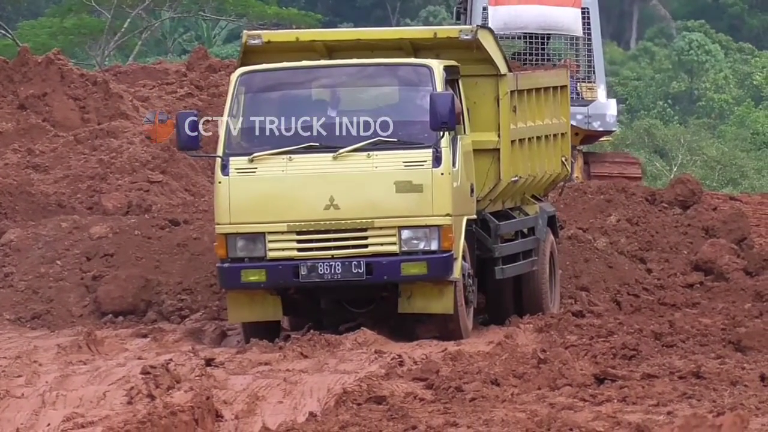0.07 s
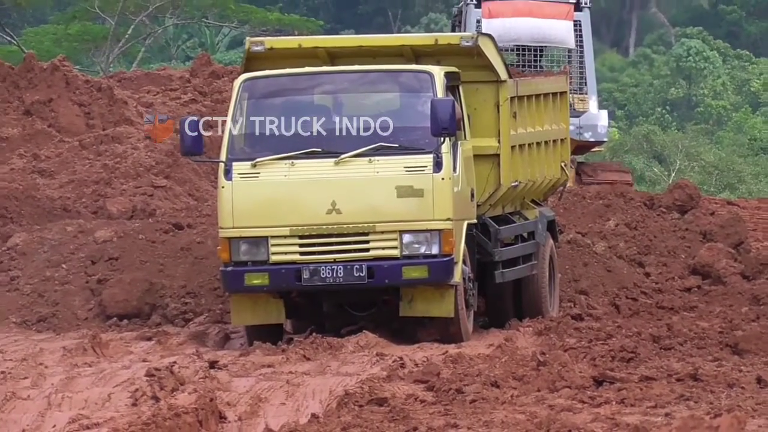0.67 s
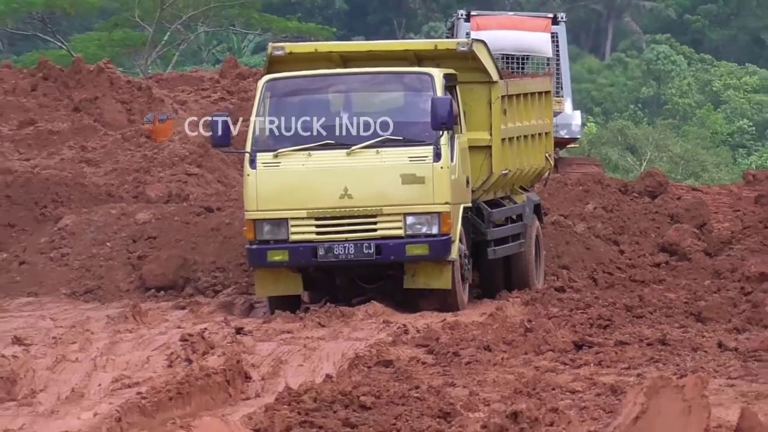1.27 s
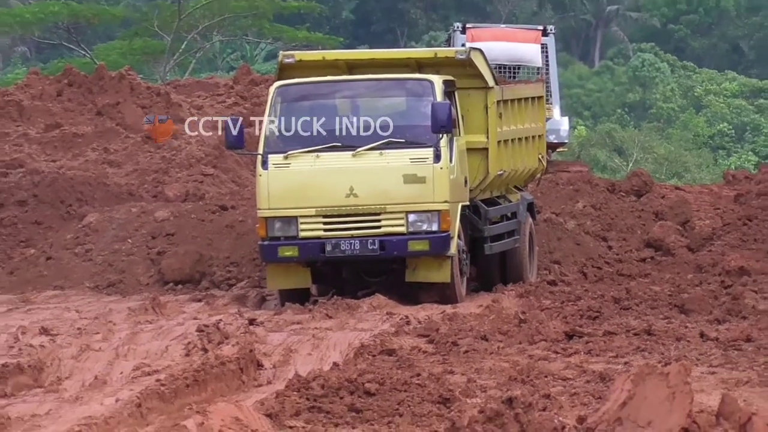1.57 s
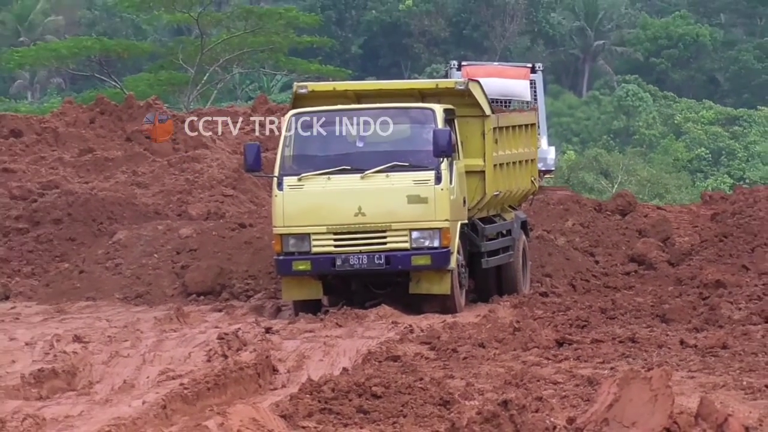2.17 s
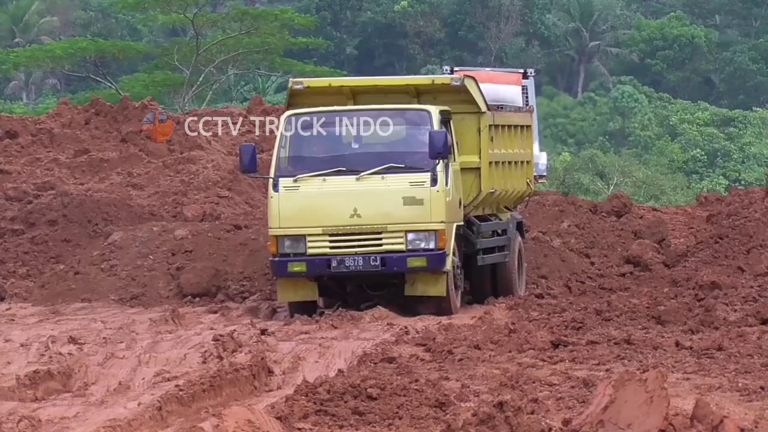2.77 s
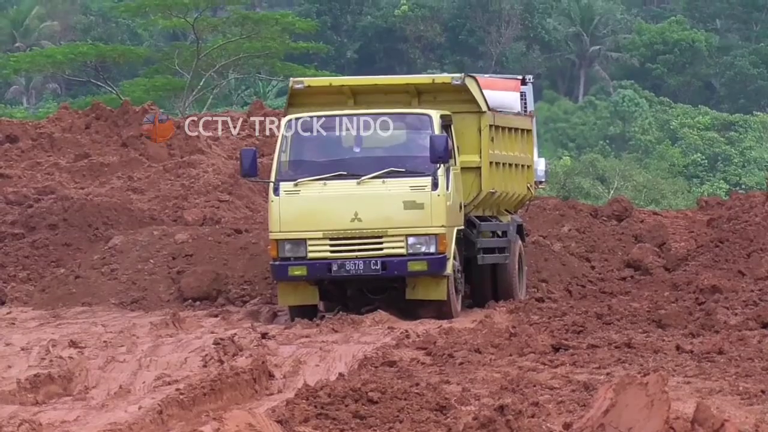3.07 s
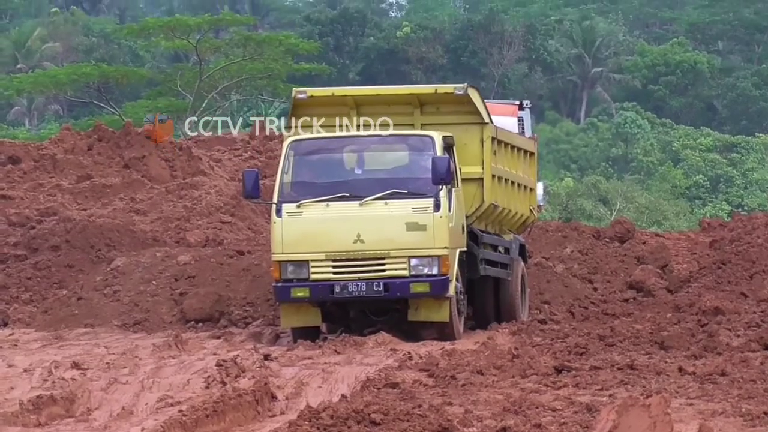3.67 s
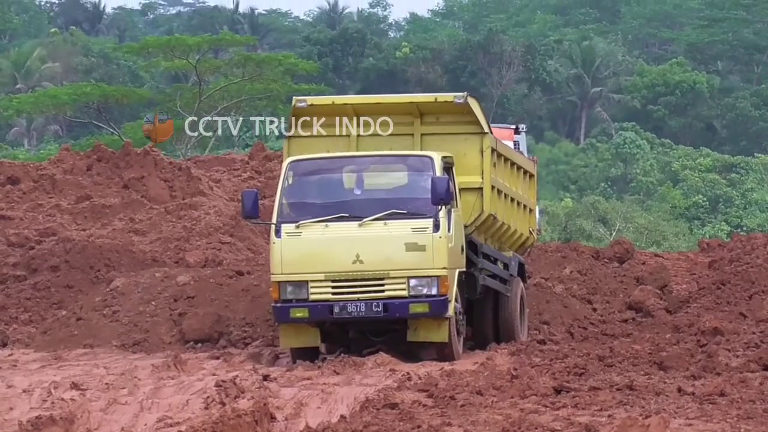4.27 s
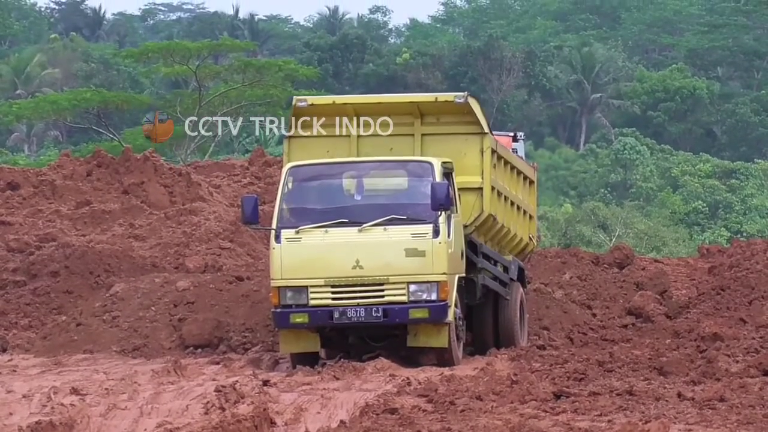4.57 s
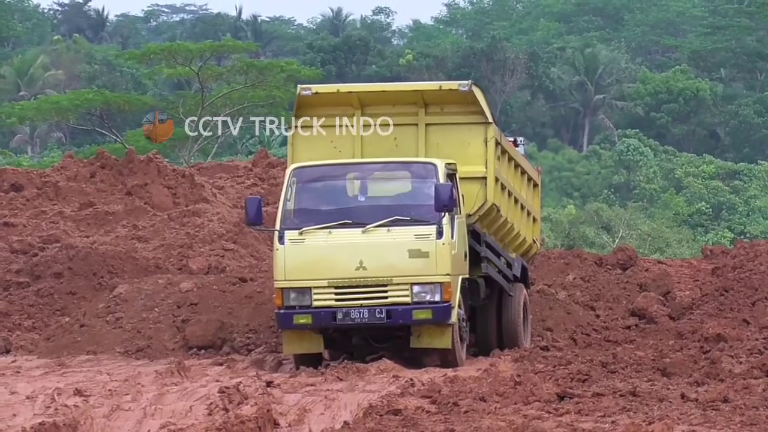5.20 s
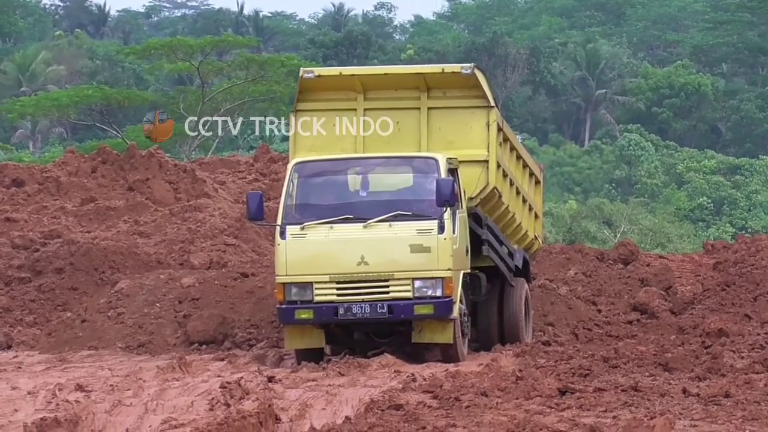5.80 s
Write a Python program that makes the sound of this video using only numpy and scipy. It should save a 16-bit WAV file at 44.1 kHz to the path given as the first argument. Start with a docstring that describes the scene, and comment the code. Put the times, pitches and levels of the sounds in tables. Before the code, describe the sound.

A diesel dump truck and an excavator run together outdoors, slightly left of a stereo microphone. At the very start a valve releases a puff of air that fades within a second. The truck's revs fall from about 0.4 seconds to a clattering idle, while the excavator holds a steady, fast drone. Its steel bucket thuds and clanks irregularly from 0.6 seconds, loudest just after 1 second and again around 2.5, with a brief echo off earth banks. Hydraulic oil hisses in soft surges, and a pump whines faintly on and off. Thin, very high squeaks come from the right between 2.2 and 2.8 seconds and again near 3.8. At about 3.6 seconds the truck's note swells a little as the hoist lifts the bed, and the knocks grow sparse. From 5.3 seconds grit ticks and trickles down the bed, the engines running on until nearly 6 seconds.

```python
"""A diesel dump truck tips its bed on an earthworks site, a little left of a stereo microphone.
Its firings sound the exhaust and ring block and chassis; the revs fall to idle, then the note swells
as the hoist takes the load. Behind it an excavator runs at steady high speed, its steel bucket clanking
and thudding. Air puffs from a valve, oil hisses, grit ticks on the bed and something squeaks thinly
off to the right; the earth banks answer the bucket briefly."""
import sys
import numpy as np
from scipy import signal
from scipy.fft import rfft, irfft, next_fast_len
from scipy.io import wavfile
from scipy.ndimage import uniform_filter1d, map_coordinates

SR = 44100
rng = np.random.default_rng(int(sys.argv[2]) if len(sys.argv) > 2 else 0)


def persist_wave(psi):
    """Save psi, clipped to +-1, as 16-bit WAV."""
    counts = np.round(np.clip(psi, -1, 1) * 32767).astype(np.int16)
    wavfile.write(sys.argv[1], SR, np.atleast_2d(counts).T)


N = 257544

# Noise colours. Each row: frequency in Hz, relative spectral level in dB.
RUMBLE_SPECTRUM = [(20, -30), (35, -18), (48, -13), (60, 3), (80, -6), (110, -13), (180, -30), (400, -75)]  # the machines' low rumble
DRONE_SPECTRUM = [(80, -26), (122, -7), (150, -4), (190, -0.5), (225, -4.5), (265, -11), (330, -13),
                  (440, -11.5), (530, -14), (700, -26), (1500, -69)]  # the excavator's engine
RATTLE_SPECTRUM = [(180, -47), (280, -19), (350, 19), (480, -9.5), (650, 13), (1500, -73)]  # the bucket's rattling panels
CRUNCH_SPECTRUM = [(350, -23), (510, 3.5), (700, -7), (1100, -1), (1400, -15), (1850, -20), (4000, -52)]  # earth under the bucket
SCRAPE_SPECTRUM = [(700, -37), (1500, -0.5), (2300, -1), (3200, -3), (4000, -5.5), (5500, -11),
                   (8000, -11.5), (10500, -12), (12000, -28), (15000, -34)]  # scraped steel
OIL_SPECTRUM = [(900, -1), (2000, 1), (3300, 1.5), (4300, 0.5), (5600, -5), (7700, -2), (9500, -2),
                (11500, -6.5), (13500, -16), (15300, -19)]  # oil through valves
AIR_SPECTRUM = [(1000, 4), (2200, -4), (4000, -1.5), (5600, -4.5), (8000, -2), (9500, -3), (11500, -8.5),
                (13500, -14), (15300, -30)]  # escaping air
GRIT_SPECTRUM = [(2500, -2.5), (5500, -12), (7500, 4.5), (10000, 1), (13000, -5.5), (15300, -9.5)]  # stones on the bed
CLATTER_SPECTRUM = [(300, -44), (520, 1.5), (640, 6), (900, 4.5), (1250, 0), (1450, -2), (1750, -12),
                    (2250, -8.5), (2700, -20), (4000, -17.5), (6000, -27), (15000, -53)]  # the truck's engine
ROAR_SPECTRUM = [(40, -45), (62, -14), (80, -5), (100, 0), (130, -1), (180, -36), (400, -75)]  # gas leaving its pipe

# Echo off the earth banks. Each row: frequency in Hz, seconds to fall 60 dB.
BANK_DECAY = [(150, 0.19), (1000, 0.21), (4000, 0.54), (12000, 0.26)]
# The excavator's engine speed. Each row: time in seconds, firing rate in Hz.
EXCAVATOR_SPEED = [(0, 147.1), (0.3, 148.7), (1.1, 147.5), (1.55, 146.3), (2.0, 145.6), (2.5, 145.8),
                   (3.2, 150), (3.7, 146.9), (4.1, 147.3), (4.4, 145.1), (4.85, 146.6), (5.12, 146.2),
                   (5.5, 146.3), (5.84, 147.8)]
# Its hum swells and dips. Each row: time in seconds, relative level in dB.
EXCAVATOR_HUM = [(0.0, -27), (0.21, -27.5), (0.36, -29.5), (0.44, -25.5), (0.49, -35), (0.53, -24),
                 (0.7, -28.5), (0.75, -29), (0.93, -25), (1.04, -31), (1.12, -23.5), (1.28, -28.5),
                 (1.35, -27), (1.71, -31), (1.89, -25.5), (1.98, -38), (2.05, -29), (2.1, -31.5),
                 (2.26, -28), (2.31, -23.5), (2.47, -30), (2.54, -24.5), (2.65, -23.5), (2.7, -32),
                 (2.86, -25.5), (2.89, -32), (2.99, -25.5), (3.22, -29), (3.3, -25.5), (3.37, -39),
                 (3.45, -26), (3.51, -27), (3.56, -33.5), (3.67, -24.5), (3.74, -29), (3.79, -29),
                 (3.85, -33), (3.9, -27), (4.1, -35), (4.21, -26.5), (4.28, -33), (4.33, -29),
                 (4.44, -27.5), (4.5, -36), (4.65, -29), (4.93, -35), (5.11, -26.5), (5.43, -35.5),
                 (5.46, -26.5), (5.5, -40), (5.56, -28), (5.59, -37), (5.68, -30), (5.73, -42),
                 (5.77, -28.5), (5.84, -28)]
# Exhaust notes. Each row: multiple of the firing rate, relative level in dB.
EXCAVATOR_ORDERS = [(1, 0.5), (1.5, -34), (2, -17.5), (2.5, -18.5), (3, -29)]
TRUCK_ORDERS = [(1, 5), (1.5, -10), (2, 2.5), (2.5, -10), (3, -10), (4, -6), (4.5, -5), (5, -16), (6, -8)]
# Engine noise. Each row: time in seconds, excavator drone and truck clatter in relative dB.
ENGINE_LEVELS = [(0.0, -32.5, -39.5), (0.93, -28, -40), (1.04, -27, -36.5), (1.61, -32, -43.5),
                 (2.02, -28.5, -40), (2.32, -31.5, -40), (2.73, -29, -36.5), (2.94, -31.5, -38.5),
                 (3.46, -30, -36.5), (3.89, -32.5, -40.5), (4.49, -33, -38.5), (5.84, -27.5, -39.5)]
# Hydraulic events. Each row: start in seconds, length in seconds, relative level in dB.
PUMP_STROKES = [(1.98, 0.25, -37), (2.36, 0.64, -34), (3.52, 0.12, -33.5), (3.82, 0.35, -36),
                (5.05, 0.26, -35.5)]  # the pump under load
OIL_SURGES = [(2.05, 0.069, -49), (2.68, 0.16, -48), (3.15, 0.18, -43), (4.1, 0.083, -46.5),
              (4.7, 0.16, -48), (5.42, 0.48, -47.5)]  # a valve opens
VALVE_SINGS = [(0.92, 0.12, -54), (1.98, 0.08, -58), (4.1, 1.8, -62)]  # a valve sings
# Bucket blows. Each row: start in seconds; arm, panel, ring and clack levels in dB;
# softness from 0 (bare steel) to 1 (a cushion of earth); place struck from 0 (teeth) to 1 (heel).
BUCKET_BLOWS = [(0.608, -12, -20, -26, -47, 1, 0.9), (0.788, -28, -22, -24.5, -39, 0.26, 0.73),
                (0.829, -35, -14.5, -29, -48, 1, 0.6), (0.885, -18.5, -34, -38, -52, 0.8, .5),
                (1.03, -34, -26, -20, -33, 0.1, .8), (1.041, -27, -21, -13.5, -20, .12, 0.66),
                (1.051, -20, -9, -25, -30, 0.5, .95), (1.064, -17, -23, -21, -36, 0.15, .9),
                (1.088, -11.5, -32, -25, -39, .4, .9), (1.161, -14.5, -19, -19, -34, 0.16, 1),
                (1.186, -23, -23, -19.5, -28.5, 0.01, 1), (1.209, -26, -23, -25, -50, 0.6, 0.9),
                (1.254, -17.5, -27, -28, -52, 0.5, 0.9), (1.314, -36, -34, -37, -52, 0.3, 1),
                (1.625, -24, -24, -27.5, -39, 0.7, 1), (1.788, -24, -22.5, -20, -31, 0.54, 0.25),
                (1.808, -20, -22, -22.5, -44, 0.8, 0.6), (1.871, -21, -23, -26, -35, 1, 0.5),
                (1.93, -17.5, -24, -21.5, -34, .8, 0.8), (1.962, -30, -22, -26, -46, .6, 0.7),
                (1.991, -26, -33, -29.5, -48, 0.5, 0.3), (2.036, -17.5, -31, -45, -50, .8, .5),
                (2.158, -22.5, -22, -23.5, -35, .85, 0.4), (2.205, -20, -23.5, -34, -48, .8, 0.6),
                (2.32, -22.5, -17.5, -22.5, -46, 1, 0.7), (2.41, -19, -35, -45, -52, .8, .5),
                (2.481, -32, -25, -15.5, -38, 0.5, .15), (2.497, -20.5, -16, -19.5, -31, .7, 0),
                (2.508, -20, -28, -12, -37, 0.3, .02), (2.522, -15.5, -27, -38, -50, .6, .2),
                (2.728, -47, -21, -20, -35, 0.45, 0.25), (2.757, -26, -22, -28, -45, 0.6, 0.3),
                (2.783, -30, -23, -27, -46, .9, .5), (2.842, -15, -31, -25.5, -46, .6, 0.5),
                (2.905, -16, -32, -34, -48, .6, .5), (3.099, -22.5, -33, -30.5, -33, 0.6, 0.3),
                (3.178, -17, -26, -36, -48, .7, 0.4), (3.417, -15.5, -42, -27, -32, 0.3, .6),
                (3.583, -14.5, -24, -30, -50, 1, .8), (3.915, -19, -25, -44, -54, 0.5, .7),
                (4.795, -20, -25, -29, -44, .8, .5), (5.325, -21, -18, -32, -50, 0.7, 0.6)]
# The bucket's ring. Each row: frequency in Hz, relative dB struck on the teeth and on the heel,
# seconds to fall 60 dB.
BUCKET_MODES = [(455.5, -7, 3, 0.16), (503.5, -10, 7.5, .2), (559.5, -1, -14, 0.24), (644, -7, -3, 0.23),
                (747.5, -3, -9, 0.27), (784, -13, 5.5, 0.15), (848, -3, -4, 0.23), (956, -2.5, 0.5, 0.16),
                (1087, 7.5, -1, 0.085), (1145, -5, 3, 0.11), (1202, -10, -1, 0.12), (1302, -2, -10, 0.16),
                (1390, 2, -1.5, .08), (1505, -1, 2, 0.056)]
# Other struck steel. Each row: frequency in Hz, relative level in dB, seconds to fall 60 dB.
ARM_MODES = [(174.3, 9, 0.1), (196.9, 10.5, 0.24), (209, -2, 0.39), (232.5, -1, 0.47)]  # the hollow arm
PANEL_MODES = [(280.6, -4, 0.12), (342.5, 1.5, 0.14), (375, -10, 0.13)]  # the bucket's large panels
PIN_MODES = [(1627, 5.5, 0.069), (1890, -1, 0.06), (2034, 2, 0.063), (2170, -6.5, 0.053), (2302, 0, 0.052),
             (2650, -5, 0.04), (2920, -7, 0.048), (3160, -3.5, 0.037)]  # its pins and teeth
# Thin squeaks. Each row: start and length in seconds, first and last pitch in Hz, relative level in dB.
SQUEAKS = [(2.25, .03, 10550, 10620, -54), (2.277, 0.07, 11700, 11340, -40), (2.34, .07, 11350, 11550, -58),
           (2.345, 0.16, 11200, 11170, -51.5), (2.46, 0.049, 11380, 11250, -54),
           (2.52, 0.053, 11120, 11060, -54), (2.59, 0.04, 11630, 11780, -48.5),
           (2.72, 0.036, 11120, 10600, -55), (3.62, 0.21, 11950, 11850, -63),
           (3.77, 0.088, 11000, 11220, -52)]
# Stones hitting the steel bed. Each row: start in seconds, relative level in dB.
GRIT_TICKS = [(0.8091, -39.5), (1.186, -47), (1.6071, -36), (1.8507, -41), (1.8841, -39.5), (5.3293, -36),
              (5.3579, -29.5), (5.4765, -35.5), (5.5962, -35.5), (5.683, -38), (5.7128, -31), (5.8038, -39),
              (5.8303, -31)]
# The truck's resonances. Each row: frequency in Hz, width in Hz, relative level in dB.
CHASSIS_RESONANCES = [(245, 42, -2), (297, 30, -0.5), (376, 52, -1), (430, 52.5, 0.5), (496.5, 36, -2)]
BLOCK_RESONANCES = [(1114, 97, 0.5), (1253, 69, 1.5), (1327, 74, 0), (2255, 110, -17), (3500, 140, -16.5)]
# Stereo width at the microphone. Each row: frequency in Hz, left-right likeness from 0 to 1.
MIC_LIKENESS = [(60, 0.93), (200, 0.98), (380, 0.55), (690, 0.66), (1280, 0.91), (2350, 0.37), (4300, 0.2),
                (8000, 0.11), (14000, 0.98)]
# Balance at the microphone. Each row: frequency in Hz, left minus right in dB.
MIC_BALANCE = [(60, 2), (80, 0.5), (140, -0.5), (300, 0.4), (500, 0.4), (760, 2), (1160, 4.5), (1770, 2.5),
               (2710, 2.5), (4000, 2), (6300, 3.5), (7700, 4.5), (9650, -0.5), (12000, -5.5), (14700, 1)]
# Earlier arrival on the left. Each row: frequency in Hz, phase lead in radians before MIC_GAP_S caps it.
MIC_LEAD = [(20, 0.074), (500, 0.15), (1030, 0.8), (2100, 0.66), (3300, 1.03), (4300, 2.4), (6000, 4.5),
            (7000, 4.8), (8700, 8.5), (11000, 10.65), (12300, 10.6), (13200, 13), (15000, 14.4)]

MIC_GAP_S = 0.00017  # longest travel time between the microphone's two sides
SIDES = np.array([[.5], [-.5]])  # splits a difference between left and right
SLIDE_S, SLIDE_RISE_S = 5.25, 0.07  # dry crumbs start down the bed


def amp(db):
    """Decibels to gain."""
    return 10 ** (np.asarray(db) / 20)


def unit(x):
    """Scale to rms 1."""
    return x / np.sqrt(np.mean(x ** 2) + 1e-20)


def along(points, hz):
    """Read (Hz, value) points on a log frequency axis."""
    freqs, values = np.transpose(points)
    return np.interp(np.log(hz + 1), np.log(freqs + 1), values)


def curves(rows):
    """One value per sample for each column after the time."""
    times, *columns = np.transpose(rows)
    return [np.interp(np.arange(N) / SR, times, column) for column in columns]


def wobble(rate):
    """A smooth random curve, rate knots a second."""
    knots = rng.standard_normal(int(N * rate / SR) + 4)
    return map_coordinates(knots, [np.arange(N) * rate / SR])


def ramp(start, rise):
    """From 0 at start to 1 after rise seconds."""
    return np.clip((np.arange(N) / SR - start) / rise, 0, 1)


def swells(rows, attack_s, fall_db_per_s):
    """Gain of overlapping events that rise, hold and die away."""
    t = np.arange(N) / SR
    gains = [ramp(start, attack_s) * amp(db - fall_db_per_s * np.maximum(t - start - length, 0))
             for start, length, db in rows]
    return np.linalg.norm(gains, axis=0)


def filtered(x, response):
    """Filter by a complex response of frequency."""
    size = next_fast_len(N + 8192)
    return irfft(rfft(x, size) * response(np.fft.rfftfreq(size, 1 / SR)), size)[..., :N]


def add(track, start, sound):
    """Mix a sound into a track at start seconds."""
    part = track[..., max(round(start * SR), 0):][..., :sound.shape[-1]]
    part += sound[..., :part.shape[-1]]


def rush(spectrum, gate=1):
    """Stereo noise of rms 1, chopped by a gate and then coloured; nearly mono in the bass."""
    def colour(hz):
        width = np.arccos(np.clip(along(MIC_LIKENESS, hz), -1, 1)) / 2
        return amp(along(spectrum, hz)) * [np.cos(width), np.sin(width)]
    mid, side = filtered(gate * rng.standard_normal((2, N)), colour)
    return unit(np.array([mid + side, mid - side]))


def patchy(x, depth_db):
    """Each band of the noise swells and fades at random, making hiss and clatter uneven."""
    bands = signal.stft(x, nperseg=1024)[2]
    fading = uniform_filter1d(rng.standard_normal(bands.shape[1:]), size=4, axis=0)
    fading = unit(uniform_filter1d(fading, size=7, axis=1))
    return unit(signal.istft(bands * amp(depth_db * fading), nperseg=1024)[1][:, :N])


def tones(cycles, orders, waver_db, drift):
    """Multiples of a base rate, each wavering in level and phase on its way through the open air."""
    total = np.zeros(N)
    for order, db in orders:
        gain = amp(db + waver_db * wobble(13)) * np.sqrt(2)
        phase = 2 * np.pi * order * cycles + drift * order * wobble(9)
        total += gain * np.sin(phase + rng.uniform(0, 2 * np.pi))
    return total


def firing(cycles, depth, sharpness, scatter_db):
    """An envelope that jumps at each firing; the four cylinders differ and no two firings are equal."""
    stroke = cycles.astype(int)
    cylinder = rng.standard_normal(4)[stroke % 4]
    size_db = scatter_db * (cylinder / 2 + rng.standard_normal(2000)[stroke])
    return unit(1 + depth * amp(size_db) * np.exp(-sharpness * (cycles % 1)))


def chug(cycles, resonances, scatter_db, jitter_s):
    """One uneven thump per firing rings a set of resonances; the four cylinders differ."""
    def body(f):
        return sum((-1) ** k * amp(db) * 1j * f * width / (hz * hz - f * f + 1j * f * width)
                   for k, (hz, width, db) in enumerate(resonances))
    onsets = np.flatnonzero(np.diff(np.floor(cycles)))
    size, late = rng.standard_normal((2, 1000))[:, :len(onsets)]
    cylinder = rng.standard_normal(4)[np.arange(len(onsets)) % 4]
    onsets = np.clip(onsets + late * jitter_s * SR, 0, N - 1).astype(int)
    thumps = np.bincount(onsets, amp(scatter_db * np.tanh(size + cylinder / 2)), N)
    return unit(filtered(thumps, body))


def ring(modes, t, scatter_db):
    """Struck steel: every blow shares its strength differently among the modes."""
    hz, db, t60 = np.transpose(modes)[:, :, None]
    share, detune, phase = rng.standard_normal((3, len(modes), 1))
    gain = amp(db + scatter_db * share)
    waves = np.sin(2 * np.pi * hz * (1 + 0.0048 * detune) * t + np.pi * phase)
    return np.sum(gain * amp(-60 * t / t60) * waves, axis=0) / np.linalg.norm(gain)


def site_rumble(hum_hz=62, slide_db=8):
    """A faint hum far off, under the machines' rumble; the shifting load adds to the rumble."""
    far_hum = amp(-49) * tones(np.arange(N) / SR, [(hum_hz, 0)], waver_db=1, drift=0.0029)
    return far_hum + amp(-53 + slide_db * ramp(SLIDE_S, SLIDE_RISE_S)) * rush(RUMBLE_SPECTRUM)


def earth_banks(x):
    """The banks scatter a short tail back to the microphone."""
    hz, t, bands = signal.stft(rng.standard_normal((2, SR // 2)), SR, nperseg=256)
    decay = amp(-60 * t / along(BANK_DECAY, hz)[:, None])
    tail = signal.istft(bands * decay, SR, nperseg=256)[1]
    return signal.fftconvolve(x, tail / np.linalg.norm(tail[0]), axes=1)[:, :N]


def excavator_engine(pump_order=2.94):
    """Behind the truck a diesel hums and drones with its firings; its pump whines louder under load."""
    cycles = np.cumsum(curves(EXCAVATOR_SPEED)[0]) / SR
    hum_db, drone_db = curves(EXCAVATOR_HUM)[0], curves(ENGINE_LEVELS)[0]
    hum = amp(hum_db - 0.44) * tones(cycles, EXCAVATOR_ORDERS, waver_db=-0.06, drift=0.19)
    pulses = firing(cycles, depth=0.82, sharpness=5.3, scatter_db=2)
    drone = amp(drone_db - 1 + 1.26 * wobble(14)) * rush(DRONE_SPECTRUM, pulses)
    pump_level = np.hypot(amp(-43.5), swells(PUMP_STROKES, attack_s=0.06, fall_db_per_s=45))
    pump_phase = 2 * np.pi * pump_order * cycles + 0.82 * wobble(45)
    whine = pump_level * amp(4.6 * wobble(30) - 1.5) * np.sin(pump_phase)
    return hum + drone + whine


def contacts(settle_s=(0.05, 0.26), settle_db=-28.5):
    """Each bucket blow, then a quieter one as a loose part falls back."""
    for start, *levels_db, softness, place in BUCKET_BLOWS:
        yield start, levels_db, softness, place
        yield start + rng.uniform(*settle_s), np.add(levels_db, settle_db), softness, place


def bucket(arm_rise_s=0.0062, cushion_db=-15, ring_left_db=2.5):
    """Each contact booms in the arm, rings the steel and clacks the pins; earth slows and dulls it."""
    t = np.arange(SR // 2) / SR
    body, steel, rattle, crunch, scrape = np.zeros((5, N))
    for start, (arm_db, panels_db, ring_db, clack_db), softness, place in contacts():
        rise_s = np.interp(softness, [0, 1], [0.00076, 0.0086])
        t60 = np.interp(softness, [0, 1], [0.091, 0.27])
        rise = 1 - np.exp(-t / rise_s)
        burst = rise * amp(-60 * t / t60)
        modes = [(hz, teeth + place * (heel - teeth), decay) for hz, teeth, heel, decay in BUCKET_MODES]
        arm_rise = 1 - np.exp(-t / arm_rise_s)
        add(body, start, amp(arm_db) * ring(ARM_MODES, t, scatter_db=0.5) * arm_rise)
        add(body, start, amp(panels_db) * ring(PANEL_MODES, t, scatter_db=2.5) * rise)
        add(steel, start, amp(ring_db) * ring(modes, t, scatter_db=1.9) * rise)
        add(steel, start, amp(clack_db) * ring(PIN_MODES, t, scatter_db=1.2) * rise)
        add(rattle, start, amp(panels_db - 16) * burst)
        add(crunch, start, amp(ring_db - 10) * burst)
        add(scrape, start, amp(clack_db - 6.5 + cushion_db * softness) * burst)
    grain = amp(4 * wobble(400))
    noise = rattle * rush(RATTLE_SPECTRUM, grain)
    noise += crunch * rush(CRUNCH_SPECTRUM, grain)
    noise += scrape * rush(SCRAPE_SPECTRUM, grain)
    return body + steel * amp(ring_left_db * SIDES) + noise  # the ringing steel faces left


def squeaks(flutter=0.004):
    """Thin, unsteady gliding squeaks to the right of the microphone."""
    track = np.zeros(N)
    for start, length, first_hz, last_hz, db in SQUEAKS:
        progress = np.linspace(0, 1, int(length * SR))
        waver = np.interp(progress, np.linspace(0, 1, 20), rng.standard_normal(20))
        hz = (first_hz + (last_hz - first_hz) * progress) * (1 + flutter * waver)
        envelope = amp(db) * np.sqrt(abs(np.sin(np.pi * progress)))
        add(track, start, envelope * np.sin(2 * np.pi * np.cumsum(hz) / SR))
    return track * amp(1.9 * wobble(110)) * amp([[-9], [7]])


def hydraulics(truck_cycles, sing_hz=3480):
    """Oil hisses through the valves and surges as each one opens; one sings faintly."""
    flow = np.hypot(amp(-48.5), swells(OIL_SURGES, attack_s=0.08, fall_db_per_s=19.5))
    pulses = firing(truck_cycles, depth=0.11, sharpness=0.72, scatter_db=5.5)
    hiss = flow * patchy(rush(OIL_SPECTRUM, pulses), depth_db=2.07)
    tone = amp(3.1 * wobble(13)) * np.sin(2 * np.pi * sing_hz * np.arange(N) / SR + 0.78 * wobble(240))
    return hiss + swells(VALVE_SINGS, attack_s=0.049, fall_db_per_s=90) * tone


def air_release(start_s=0.11, rise_s=0.013, t60=1.42):
    """A valve snaps open and the hiss dies as the pressure falls."""
    t = np.maximum(np.arange(N) / SR - start_s, 0)
    return amp(-34.5 - 60 * (t / t60) ** 1.52) * (1 - np.exp(-t / rise_s)) * rush(AIR_SPECTRUM)


def grit(rise_s=0.00088, t60=0.1):
    """Small stones tick on the tilting bed; near the end fine crumbs trickle down it."""
    t = np.arange(SR // 4) / SR
    ticks = np.zeros(N)
    for start, db in GRIT_TICKS:
        add(ticks, start, amp(db - 3 - 60 * t / t60) * (1 - np.exp(-t / rise_s)))
    trickle = ramp(SLIDE_S, SLIDE_RISE_S) * amp(-50.5 + 1.7 * wobble(60))
    return np.hypot(ticks, trickle) * rush(GRIT_SPECTRUM, amp(0.56 * wobble(700)))


def truck_running(rev_hz=85.3, idle_hz=76.46, pedal_off_s=0.42, hoist_s=3.6):
    """Firings so far, and effort in dB over idle: the revs die down, then the hoist loads the engine."""
    coast_s = np.maximum(np.arange(N) / SR - pedal_off_s, 0)
    firing_hz = idle_hz + (rev_hz - idle_hz) * np.exp(-(coast_s / 0.28) ** 2)
    rev_db = 12.5 * np.exp(-(coast_s / 0.77) ** 2)
    hoist_db = 3 * ramp(hoist_s, rise=0.15)
    return np.cumsum(firing_hz) / SR, rev_db + hoist_db


def truck_exhaust(cycles, effort_db):
    """The firing note and the roar of gas from the pipe, both louder with effort."""
    note = tones(cycles, TRUCK_ORDERS, waver_db=1.5, drift=0.12)
    roar = amp(-48.5 + 0.72 * effort_db) * rush(ROAR_SPECTRUM)
    return amp(-51.6 + effort_db + 1.7 * wobble(40)) * note + roar


def truck_engine(cycles, effort_db):
    """Each firing pulses the clatter, shakes cab and chassis, and rings the block with diesel knock."""
    clatter_db = curves(ENGINE_LEVELS)[1] + 0.52 + 0.21 * wobble(21.93)
    pulses = firing(cycles, depth=0.097, sharpness=4.6, scatter_db=2)
    clatter = amp(clatter_db) * patchy(rush(CLATTER_SPECTRUM, pulses), depth_db=2)
    chassis_db = -38 + 0.032 * effort_db + 1.3 * wobble(14)
    thumps = amp(chassis_db) * chug(cycles, CHASSIS_RESONANCES, scatter_db=6, jitter_s=0.0009)
    knock = amp(-48 + 1.3 * wobble(7)) * chug(cycles, BLOCK_RESONANCES, scatter_db=5, jitter_s=0.002037)
    return clatter + thumps + knock


def scene():
    """The machines stand a little left of the microphone, so their sound reaches that side first."""
    def from_left(hz):
        lead = np.clip(along(MIC_LEAD, hz), 0, 2 * np.pi * hz * MIC_GAP_S)
        return amp(SIDES * along(MIC_BALANCE, hz)) * np.exp(1j * SIDES * lead)
    cycles, effort_db = truck_running()
    blows = bucket()
    excavator = excavator_engine() + blows + amp(-13.5) * earth_banks(blows)
    truck = truck_exhaust(cycles, effort_db) + truck_engine(cycles, effort_db)
    site = site_rumble() + excavator + hydraulics(cycles) + air_release() + grit() + truck
    return filtered(site, from_left) + squeaks()


def record(dry, top_hz=15350):
    """The recorder keeps nothing above its band limit."""
    return filtered(dry, lambda hz: hz < top_hz)


dry = scene()
out = record(dry)
persist_wave(out)
```